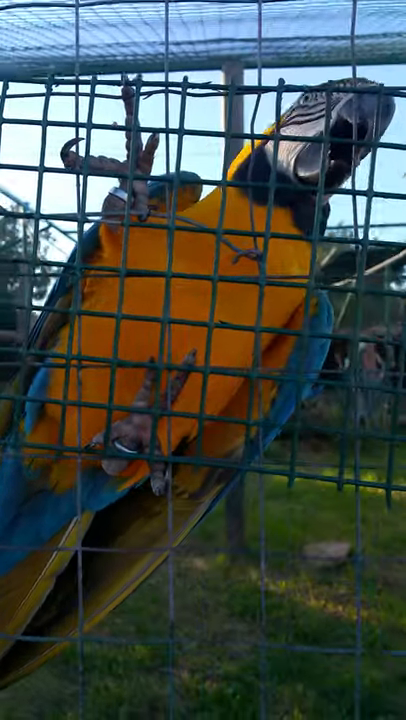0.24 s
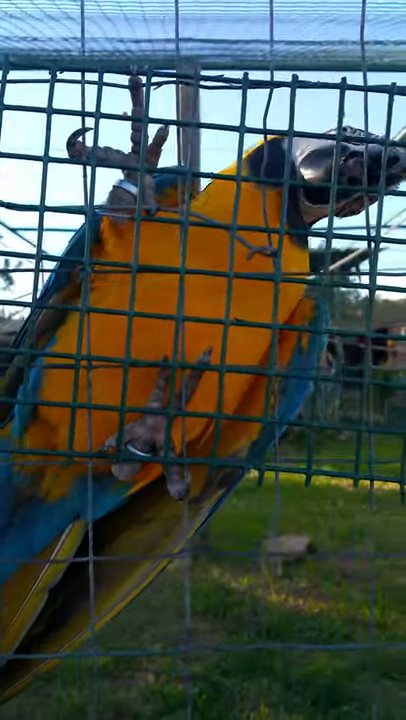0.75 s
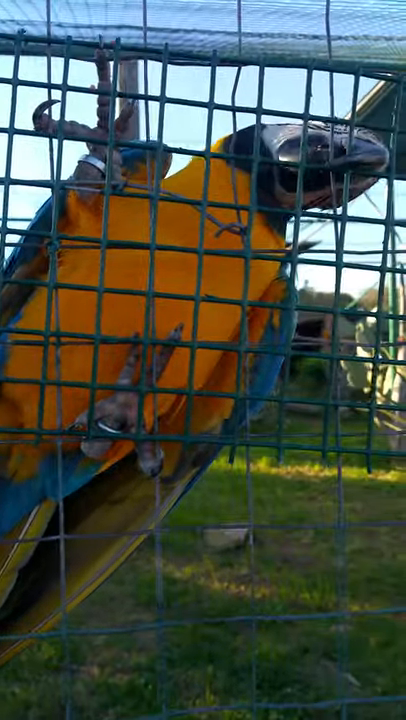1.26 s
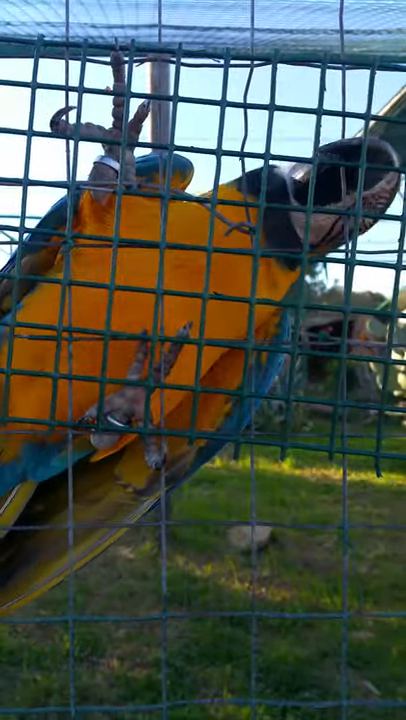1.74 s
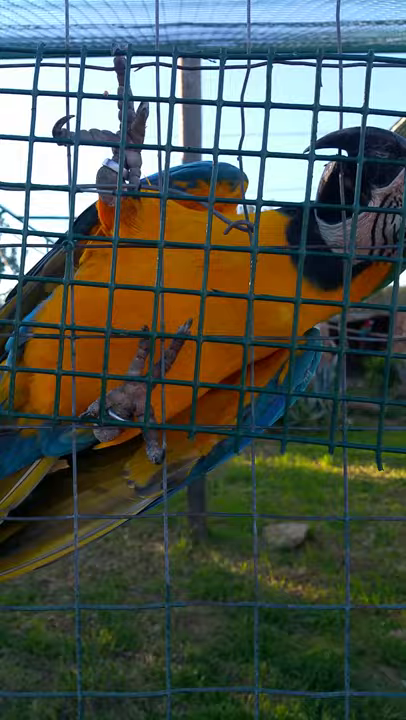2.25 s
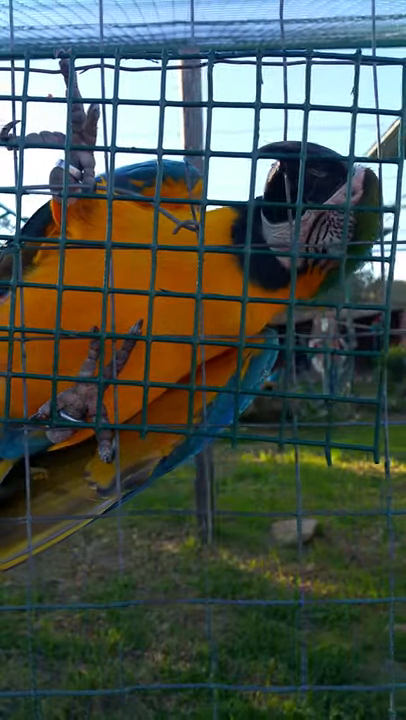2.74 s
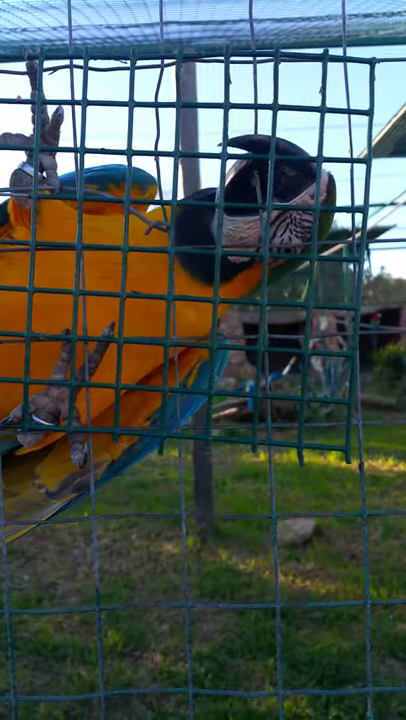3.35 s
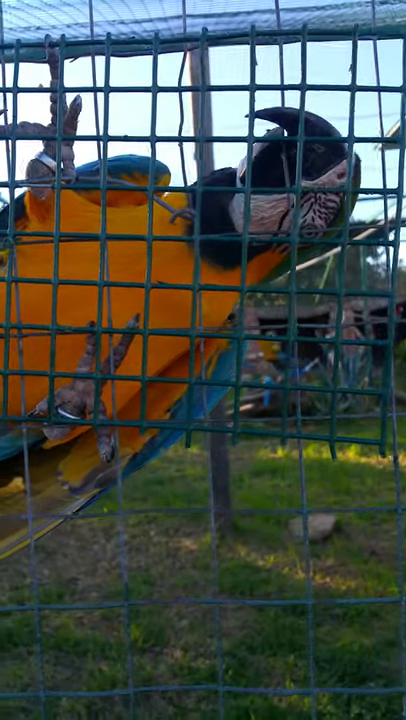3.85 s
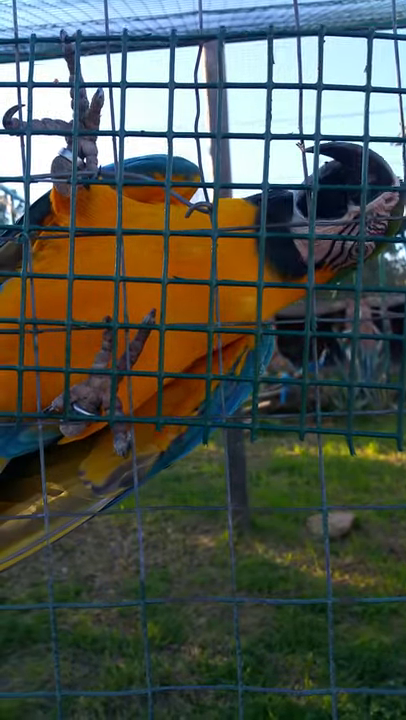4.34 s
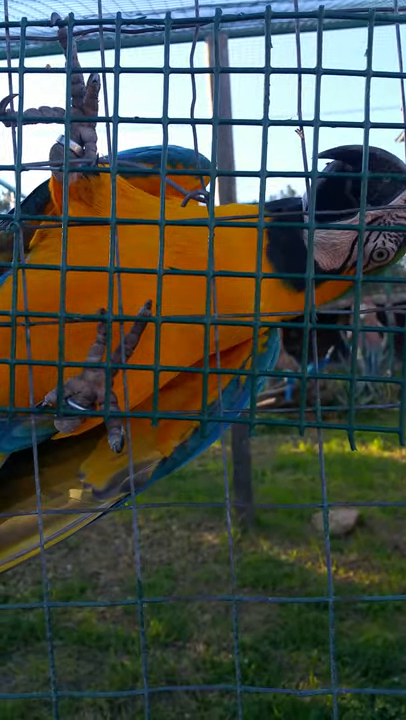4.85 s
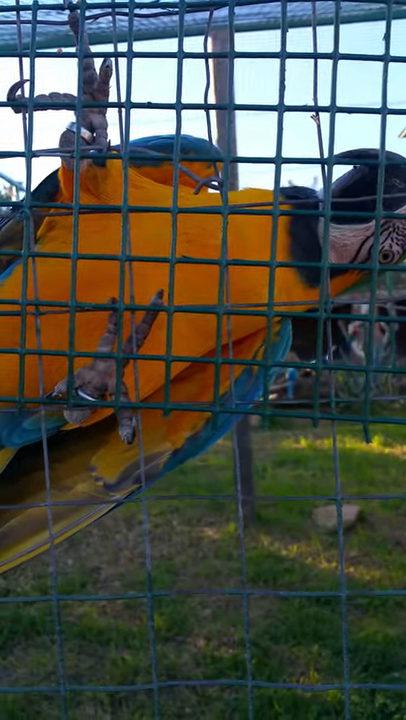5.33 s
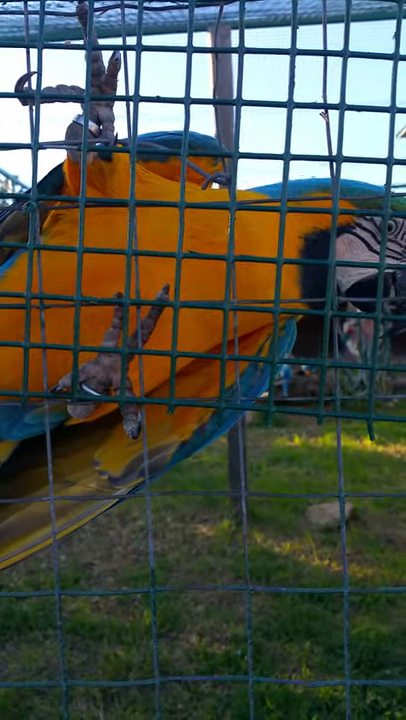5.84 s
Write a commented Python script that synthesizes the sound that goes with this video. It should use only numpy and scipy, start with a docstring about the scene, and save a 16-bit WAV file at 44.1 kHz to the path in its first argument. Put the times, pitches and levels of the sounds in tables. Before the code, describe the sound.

Loud raspy parrot squawk, then several seconds of quiet outdoor air with distant chirps and chatter, before a second, weaker hoarse squawk.

```python
"""Macaw squawks in an aviary

A macaw squawks twice, close to a phone. Each squawk starts as a low growl and breaks into a rattle:
throbs of air pressure drive bursts of syrinx pulses (the syrinx is a bird's voice box) through throat and beak.
Small birds, made of gliding tones and shaped noise, call further off over soft garden air and traffic.
The phone's gain control ducks the garden after the first squawk."""
import sys
import numpy as np
from scipy import signal
from scipy.fft import rfft, irfft, next_fast_len
from scipy.io import wavfile
from scipy.ndimage import uniform_filter1d, minimum_filter1d, map_coordinates

SR = 44100
rng = np.random.default_rng(int(sys.argv[2]) if len(sys.argv) > 2 else 0)


def store_pcm(level_fs):
    """Save levels as 16-bit WAV."""
    pcm = np.round(np.clip(level_fs, -1, 1) * 32767).astype(np.int16)
    wavfile.write(sys.argv[1], SR, np.atleast_2d(pcm).T)


N = 268480
TIME = np.arange(N) / SR


def undb(db):
    """Turn decibels into a gain."""
    return 10 ** (np.asarray(db) / 20)


def unit(x):
    """Scale a sound to an average (rms) level of 1."""
    return x / np.sqrt(np.mean(x ** 2))


def cut(x, kind, order, hz):
    """Keep the part of a sound below ("low") or above ("high") a frequency."""
    return signal.sosfilt(signal.butter(order, hz, kind, fs=SR, output="sos"), x)


def arch(start_s, length_s):
    """The samples of a call, its progress from 0 to 1, and a rounded swell over it."""
    on = (TIME > start_s) & (TIME < start_s + length_s)
    progress = (TIME[on] - start_s) / length_s
    return on, progress, np.sqrt(np.abs(np.sin(np.pi * progress)))


def walk(rate):
    """Smooth random wander, from random steps at a rate per second that are averaged twice."""
    step = max(int(SR / rate), 1)
    stairs = rng.standard_normal(N)[np.arange(N) // step]
    return 1.5 * uniform_filter1d(uniform_filter1d(stairs, step), step)


def follow(curve):
    """A gate that is open while a curve lasts, then each of its columns at every sample."""
    s, *columns = np.transpose(curve)
    gate = uniform_filter1d(1. * ((TIME > s[0]) & (TIME < s[-1])), size=200)
    return gate, *(np.interp(TIME, s, column) for column in columns)


def response(points, size=2048):
    """The click response of a (f/Hz, level/dB) spectrum: it starts at once and has an energy of 1."""
    hz, db = np.transpose(points)
    freqs = np.maximum(np.fft.rfftfreq(size, 1 / SR), 1)
    # folding the cepstrum (the spectrum of the log spectrum) puts all sound after the click
    cepstrum = irfft(np.log(undb(np.interp(np.log(freqs), np.log(hz), db))))
    cepstrum[1:size // 2] *= 2
    cepstrum[size // 2 + 1:] = 0
    h = irfft(np.exp(rfft(cepstrum)))
    return h / np.linalg.norm(h)


def ring(x, h):
    """Pass a sound through a click response."""
    return signal.oaconvolve(x, h)[:N]


def resonate(x, modes):
    """Ring narrow resonances given as (f/Hz, time to fall by 60 dB/s, level/dB)."""
    out = 0
    for hz, t60, db in modes:
        pole = np.exp((2j * np.pi * hz - np.log(1000) / t60) / SR)
        out = out + undb(db) * 2 * (1 - abs(pole)) * signal.lfilter([1], [1, -pole], x).real
    return out


def band_noise(hz, width_hz, count):
    """Noise around one resonance, rms 1."""
    freqs = np.fft.rfftfreq(count, 1 / SR)
    offset = 2 * (freqs - hz) / width_hz
    spectrum = rfft(rng.standard_normal(count)) / (1 + offset ** 4)
    return unit(irfft(spectrum, count))


def tone(hz, overtone_db):
    """A sine of rms 1 that follows a pitch, plus its octave at a level relative to it."""
    phase = 2 * np.pi * np.cumsum(hz) / SR
    return np.sqrt(2) * (np.sin(phase) + undb(overtone_db) * np.sin(2 * phase))


def ports(x, lag_ms, pan_db, shade_db=0):
    """A sound reaches the left microphone first; the right one is pan_db weaker and its top treble is shaded."""
    size = next_fast_len(N + SR // 10, True)
    freqs = np.fft.rfftfreq(size, 1 / SR)
    right_db = -pan_db - shade_db * np.interp(freqs, [5000, 7000], [0, 1])
    delay = np.exp(-2j * np.pi * freqs * lag_ms / 1000)
    right = irfft(rfft(x, size) * undb(right_db) * delay, size)
    return np.array([x, right[:N]])


def outdoors(x, t60, wet_db, dull_hz):
    """Scattered echoes that fall by 60 dB in t60 seconds, unrelated left and right."""
    t = TIME[:SR]
    build_up = 1 - np.exp(-t / 0.0028)
    tails = rng.standard_normal((2, SR)) * np.exp(-np.log(1000) * t / t60) * build_up
    tails = cut(tails, "low", 2, dull_hz)
    return undb(wet_db) * np.array([ring(x, h / np.linalg.norm(h)) for h in tails])


def throat_response(points, pipe_hz, pipe_t60, pipe_db):
    """Broad resonances of mouth and beak, plus the narrow, longer rings of the windpipe's odd modes."""
    h = response(points)
    return h + resonate(h, [(k * pipe_hz, pipe_t60, pipe_db - 10 * np.log10(k)) for k in (1, 3, 5)])


def syrinx(hz, gain, throat, jitter, shimmer_db, air_db, snaps=()):
    """The membranes snap shut once a cycle and let a puff of air through; both ring the throat."""
    step = hz * np.exp(jitter * walk(400)) / SR
    phase = np.cumsum(step)
    # the cycle starts afresh at each of these times
    for s in snaps:
        phase[TIME >= s] -= phase[np.argmax(TIME >= s)]
    at = np.flatnonzero(np.diff(phase % 1) < 0) + 1
    # share each pulse between two samples, as it falls between them
    late = np.minimum(phase[at] % 1 / step[at], 1)
    pulses = np.zeros(N)
    pulses[at - 1], pulses[at] = late, 1 - late
    air = undb(air_db) * np.exp(-2 * (phase % 1)) * rng.standard_normal(N)
    # a small beak radiates hardly any bass
    throat = cut(throat, "high", 2, 170)
    source = (pulses + air) * gain * undb(shimmer_db * walk(400))
    return ring(source, throat / np.abs(throat).max())


def flex(x):
    """Throat and tongue never hold still: tiny random shifts in time make all resonances drift."""
    shift_s, rate = .0004, 55
    return map_coordinates(x, [(TIME + shift_s * walk(rate)) * SR])


def garden():
    """Soft outdoor air, alike at both microphones in the bass, over the rumble and drone of far traffic."""
    # tint of the air, with a thin hiss near 13 kHz: f/Hz, relative level/dB
    air_tint = [(20, -19), (52, 4.5), (75, -6), (102, 2), (140, -9), (180, -6), (400, -10.5), (850, -11),
                (1600, -15.5), (5300, -19), (6800, -36.5), (12300, -38.5), (12900, -32), (13400, -41)]
    # far vehicles that swell and fade: nearest t/s, half length/s, engine note f/Hz, width/Hz, level/dB
    vehicles = [(2.697, 0.65, 56.7, 28, -53.5), (4.6, 0.84, 169.6, 59.6, -60.5),
                (5.453, 0.57, 52.3, 31.5, -59)]
    air_db = -49
    h = response(air_tint, size=8192)
    mid, side = (ring(rng.standard_normal(N), h) * undb(.9 * walk(9)) for _ in range(2))
    side = cut(side, "high", 1, 2200) + 0.092 * side
    traffic = np.zeros(N)
    for s, half, hz, width_hz, db in vehicles:
        traffic += undb(db) * band_noise(hz, width_hz, N) / np.hypot(1, ((TIME - s) / half) ** 2)
    return undb(air_db) * np.array([mid + side, mid - side]) + traffic


def hoots():
    """Far-off whistles and hoots: tones that glide evenly; the shriller they are, the more they flutter."""
    # start t/s, length/s, middle pitch f/Hz, glide/octaves, level/dB
    notes = [(-.03, 0.135, 3410, -0.25, -54), (1.45, 0.385, 2648, -0.025, -54), (1.85, 0.1, 537, 0.31, -51),
             (2.49, 0.15, 915, -0.04, -52), (2.74, 0.109, 795, -0.413, -53.5),
             (3.28, 0.21, 846, 0.023, -61), (3.86, 0.17, 4327, -0.039, -46.5)]
    out, flutter = np.zeros(N), 0.006 * walk(160)
    for s, length, hz, glide, db in notes:
        on, progress, swell = arch(s, length)
        wobble = 1 + flutter[on] * np.square(hz / 3000)
        pitch = hz * 2 ** (glide * (progress - .5)) * wobble
        out[on] += undb(db) * swell * tone(pitch, overtone_db=-24)
    return out


def twitter(count=120, low_hz=2500, spread_hz=3000, faint_db=-59.5, spread_db=6, length_s=.065, fall=.4):
    """A distant flock: chirp rows for short falling calls at random moments."""
    return [(when * N / SR, length_s, low_hz + spread_hz * pitch, fall, faint_db + spread_db * size)
            for when, pitch, size in rng.random((count, 3))]


def chirps():
    """Near and far chirps: tones that slide from a first pitch, rough-edged, warbling if they last."""
    # small birds: start t/s, length/s, first pitch f/Hz, fall/octaves (negative rises), level/dB
    solo_chirps = [(1.295, 0.12, 5170, 1, -47), (2.5, 0.058, 4520, 0.13, -47),
                   (2.694, 0.027, 5930, 0.18, -36.5), (2.785, 0.023, 6240, 0.47, -39),
                   (2.805, 0.053, 4430, 1, -45), (3.955, 0.1, 3710, 0.45, -44.5),
                   (4.178, 0.047, 6120, 0.36, -41), (4.266, 0.041, 6300, 0.94, -38.5),
                   (4.3, .065, 3370, 0.8, -47.5), (4.68, 0.025, 5900, 0.65, -40.5),
                   (4.7, 0.077, 3950, 0.39, -41), (5.388, 0.02, 4490, -0.55, -43.5),
                   (5.412, 0.047, 6610, 0.61, -39)]
    fade_db = 6.5
    warble_hz, warble_octaves, warble_after_s = 35.9, 0.11, 0.0534
    out, wobble = np.zeros(N), 1 + .018 * walk(160) + .028 * walk(1200)
    for s, length, top_hz, fall, db in [*solo_chirps, *twitter()]:
        on, progress, swell = arch(s, length)
        after = TIME[on] - s
        depth = warble_octaves * np.minimum(after / warble_after_s, 1) ** 2
        warble = depth * np.sin(2 * np.pi * warble_hz * after)
        pitch = top_hz * 2 ** (warble - fall * progress) * wobble[on]
        out[on] += undb(db - fade_db * progress) * swell * tone(pitch, overtone_db=-25.5)
    return out


def growl(curve, dull_hz, opening_s):
    """Clean syrinx pulses follow a pitch curve through a beak that slowly opens and brightens them."""
    # throat and beak while growling: f/Hz, relative level/dB
    growl_throat = [(100, -51), (220, -7), (420, -1.5), (920, 4), (1380, 3.5), (1750, -5.5), (2400, -13.5),
                    (3100, -4), (3900, -6), (4800, -35), (15000, -52)]
    start_s = curve[0][0]
    gate, hz, db = follow(curve)
    throat = throat_response(growl_throat, pipe_hz=944, pipe_t60=0.018, pipe_db=1.5)
    voice = syrinx(hz, gate * undb(db), throat, jitter=.012, shimmer_db=.7, air_db=-32, snaps=[start_s])
    muffled = cut(voice, "low", 1, dull_hz)
    opened = np.clip((TIME - start_s) / opening_s, 0, 1)
    return opened * voice + 2 * (1 - opened) * muffled


def rattle(throbs, throat, tight_hz, creak_db, tired_db):
    """Each throb tightens the membranes: loud fast pulses, then a slack creak that dies away."""
    slack_hz, creak_s, tiring_s = 220.2, 0.016, 0.045
    gain, tension, last = np.zeros(N), np.zeros(N), throbs[-1][0]
    for s, db, half in throbs:
        push = 1 / (1 + np.abs((TIME - s) / half) ** 5)
        creak = ((TIME > s - 2 * half) & (TIME < s + .032)) * np.exp(-np.abs(TIME - s) / creak_s)
        # the creak changes by tired_db towards the last throb, as the air runs out
        creak *= undb(creak_db + tired_db * np.exp((s - last) / tiring_s))
        gain += undb(db) * np.maximum(push, creak)
        tension += push
    hz = slack_hz + (tight_hz - slack_hz) * tension
    snaps = [s - .8 * half for s, _, half in throbs]
    # slack membranes leak more air
    leak_db = -23 + 7 * (1 - np.minimum(tension, 1))
    return syrinx(hz, gain, throat, jitter=.07, shimmer_db=1.3, air_db=leak_db, snaps=snaps)


def closing_beak(x):
    """As the beak closes it shuts the direct sound in and rings more sharply."""
    # resonances of the closed beak: f/Hz, time to fall by 60 dB/s, level/dB
    beak_modes = [(934, 0.032, -7), (3640, 0.012, 3), (4830, 0.027, -23), (6300, 0.016, -18)]
    start_s, closing_s, shut_db = 0.27, 0.21, -4
    closed = np.clip((TIME - start_s) / closing_s, 0, 1)
    return x * undb(shut_db * closed) + resonate(x * closed, beak_modes)


def whistles():
    """The syrinx rings on as a brief whistle that slides up to its pitch and dies away."""
    # start t/s, pitch reached f/Hz, starting level/dB
    whistle_notes = [(.222, 908, -11.5), (.256, 949, -15.5), (5.869, 1035, -17)]
    scoop_hz, scoop_s, length_s, fade_db = 110, 0.0074, 0.038, -32.5
    out = np.zeros(N)
    for s, pitch_hz, db in whistle_notes:
        on, progress, swell = arch(s, length_s)
        hz = pitch_hz - scoop_hz * np.exp((s - TIME[on]) / scoop_s)
        out[on] += undb(db + fade_db * progress) * swell * tone(hz, overtone_db=-9)
    return out


def harsh_calls():
    """Toneless chatter, and the two throat resonances of a distant parrot, both made of shaped noise."""
    # bouts of chatter: start t/s, length/s, centre f/Hz, level/dB
    chatter = [(1.052, 0.17, 3420, -52.5), (2.164, 0.23, 3340, -53.5), (2.556, 0.4, 3040, -55),
               (3.014, 0.15, 3400, -47), (3.361, 0.53, 3700, -52.5), (4.43, 0.042, 590, -50.5),
               (4.476, 0.11, 3400, -48.5), (4.919, 0.16, 3430, -47.5)]
    # throbs and a long squawk of the distant parrot, and a short tick shaped by the same resonances: start t/s,
    # length/s, level/dB
    far_squawks = [(1.784, 0.019, -48), (1.817, 0.015, -53), (1.851, 0.016, -47), (5.19, 0.34, -52.5),
                   (5.282, .02, -51)]
    # its throat: f/Hz, width/Hz, level/dB
    far_throat = [(820, 420, 0.5), (1500, 690, -5)]
    chatter_width = 0.93  # as a share of the centre
    out = np.zeros(N)
    throat = sum(undb(db) * band_noise(hz, width_hz, N) for hz, width_hz, db in far_throat)
    for s, length, db in far_squawks:
        on, _, swell = arch(s, length)
        out[on] += undb(db) * swell * throat[on]
    for s, length, hz, db in chatter:
        on, _, swell = arch(s, length)
        out[on] += undb(db) * swell * band_noise(hz, chatter_width * hz, SR)[:len(swell)]
    return out


def rasp():
    """The membranes flap chaotically in a surging stream of air, from a soft rush to a hoarse cry."""
    # surges: t/s, body level/dB, treble level/dB
    surges = [(5.68, -51, -76), (5.725, -42, -44.5), (5.842, -46, -36.5), (5.856, -37, -23.5),
              (5.865, -32, -31), (5.875, -32.5, -27), (5.884, -48, -26), (5.902, -26, -27),
              (5.91, -45, -27), (5.918, -30, -22.5), (5.972, -30.5, -23), (6, -35, -28.5), (6.09, -34, -37)]
    # throat and beak while rasping: f/Hz, relative level/dB
    rasp_throat = [(150, -19), (1030, -0.5), (1350, -8), (2000, -11.5), (2450, -20), (2950, -8.5),
                   (3900, -7), (5400, -15), (6800, -40), (15000, -51)]
    throat = throat_response(rasp_throat, pipe_hz=1007, pipe_t60=0.016, pipe_db=-1)
    flaps = syrinx(350, 1, throat, jitter=.17, shimmer_db=3, air_db=-28)
    body = unit(cut(flaps, "low", 4, 1500))
    treble = unit(cut(flaps, "high", 4, 1500))
    gate, body_db, treble_db = follow(surges)
    return gate * (undb(body_db) * body + undb(treble_db) * treble)


def squeal():
    """The rasp locks into a wavering note with a strong octave, under the second rattle."""
    # t/s, pitch f/Hz, level/dB, both before the wavering
    squeal_curve = [(5.957, 652, -38), (5.982, 762, -34.5), (6.012, 749, -30.5), (6.051, 756, -33)]
    gate, hz, db = follow(squeal_curve)
    return gate * undb(db + 2 * walk(150)) * tone(hz * (1 + .025 * walk(200)), overtone_db=1)


def far_birds():
    """Chirps, hoots and harsh calls from around the garden, smeared by their echoes."""
    calls = (chirps() + harsh_calls()) * undb(2.5 * walk(110))
    calls += hoots()
    return ports(calls, lag_ms=0.033, pan_db=-1.0) + outdoors(calls, t60=0.28, wet_db=-5.0, dull_hz=4540)


def macaw():
    """Two squawks of pulses, rasp and ringing tones; the bird turns its head between them."""
    # growls that open the squawks; the first goes slack at its end: t/s, pitch f/Hz, level/dB
    first_growl = [(.072, 215.7, -45), (.099, 212, -16), (.122, 223.3, -10.5), (.134, 240.4, -11.5),
                   (.142, 300, -8.5), (.158, 317.7, -10.5), (.163, 148.8, -10.5), (.181, 138, -11),
                   (.193, 127, -17)]
    second_growl = [(5.71, 229.4, -40), (5.778, 264.3, -24), (5.788, 371.6, -27), (5.81, 436, -17.5),
                    (5.831, 484, -15), (5.839, 530, -39)]
    # throbs of both rattles: t/s, peak level/dB, half length/s
    all_throbs = [(0.2187, -6.5, 0.004), (0.257, -5.5, 0.0055), (0.2958, 7.5, 0.0063),
                  (0.3292, 5.5, 0.0051), (0.363, 6.5, 0.0047), (0.398, 11, 0.0054), (0.4277, 11, 0.0056),
                  (0.464, 6, .0075), (6.03, -8, 0.0066), (6.064, -2.5, 0.0044), (6.088, -15, 0.0043)]
    # throat and beak in the first and second rattle: f/Hz, relative level/dB
    wide_throat = [(130, -45), (400, -13), (590, -13), (850, -1), (1070, 1), (1450, -8.5), (2000, 3.5),
                   (2750, 0), (3200, -2.5), (5200, -6), (6100, -16), (7300, -21), (15000, -40.5)]
    bark_throat = [(150, -24), (600, -10), (830, -1), (1150, -10), (1550, 4), (2000, -12), (2750, -5),
                   (3400, -2.5), (4800, -14.5), (7000, -40), (9000, -36), (15000, -57)]
    # the aviary rings on faintly: f/Hz, time to fall by 60 dB/s, level/dB
    aviary_modes = [(1950, .4, -6), (2090, .35, -8)]
    head_turn_s = 3
    wide = throat_response(wide_throat, pipe_hz=960, pipe_t60=.02, pipe_db=-5)
    narrow = throat_response(bark_throat, pipe_hz=880, pipe_t60=0.025, pipe_db=4)
    early = [row for row in all_throbs if row[0] < head_turn_s]
    late = [row for row in all_throbs if row[0] >= head_turn_s]

    first_rattle = rattle(early, wide, tight_hz=376.8, creak_db=-16.5, tired_db=18.5)
    first = flex(closing_beak(first_rattle))
    first += growl(first_growl, dull_hz=450, opening_s=0.08) + whistles()

    second = growl(second_growl, dull_hz=490, opening_s=0.43) + flex(rasp()) + squeal()
    second += rattle(late, narrow, tight_hz=318.3, creak_db=0.5, tired_db=-16)

    near = ports(first, lag_ms=0.2, pan_db=2.5, shade_db=4.5) + ports(second, lag_ms=0.12, pan_db=1.5)
    voice = first + second
    # the bird's body and the netting overhead scatter the voice at once; the aviary and garden ring on longer
    scatter = outdoors(voice, t60=.025, wet_db=-16, dull_hz=5000)
    echoes = outdoors(voice, t60=0.55, wet_db=-30.0, dull_hz=2850)
    return near + scatter + resonate(voice, aviary_modes) + echoes


def scene():
    """Everything that reaches the two microphones."""
    return macaw() + far_birds() + garden()


def record(dry, ceiling=1.06, hold_s=1.21, release_s=0.22):
    """Gain control drops at once on a peak, holds, then recovers; sharp peaks are rounded and the top is cut."""
    top_hz = 15800
    need_db = 20 * np.log10(np.minimum(1, ceiling / (np.abs(dry).max(axis=0) + 1e-9)))
    half = int(hold_s * SR / 2)
    # the shifted window looks back over the hold time
    held_db = minimum_filter1d(need_db, 2 * half + 1, origin=half, mode="constant")
    pole = np.exp(-1 / (release_s * SR))
    gain_db = np.minimum(held_db, signal.lfilter([1 - pole], [1, -pole], held_db))
    smooth_db = uniform_filter1d(minimum_filter1d(gain_db, size=65), size=65)
    loud = dry * undb(smooth_db)
    rounded = loud / (1 + loud ** 6) ** (1 / 6)
    return signal.sosfilt(signal.ellip(8, .2, 70, top_hz, fs=SR, output="sos"), rounded)


dry = scene()
out = record(dry)
store_pcm(out)
```